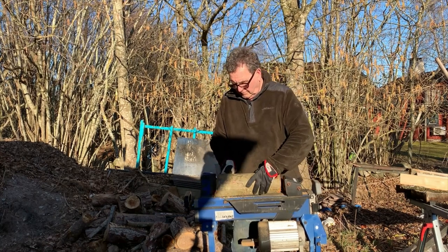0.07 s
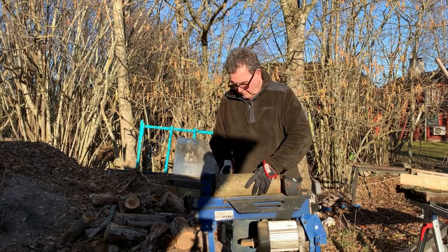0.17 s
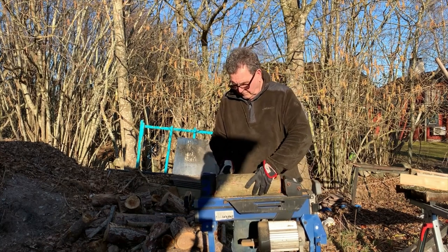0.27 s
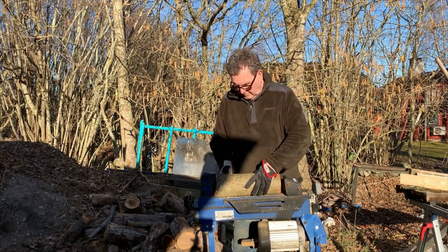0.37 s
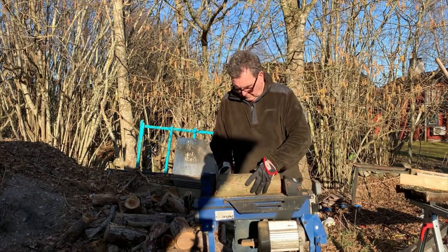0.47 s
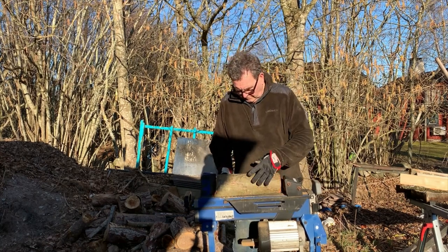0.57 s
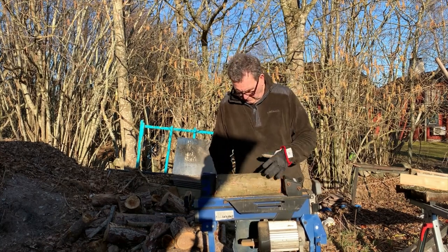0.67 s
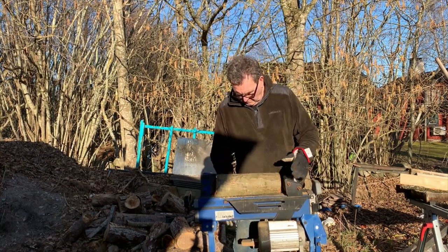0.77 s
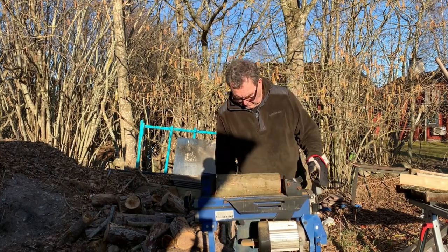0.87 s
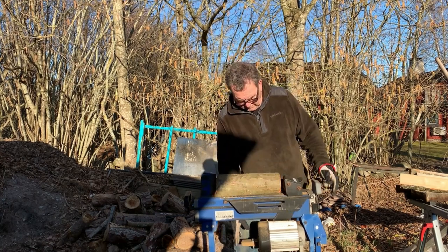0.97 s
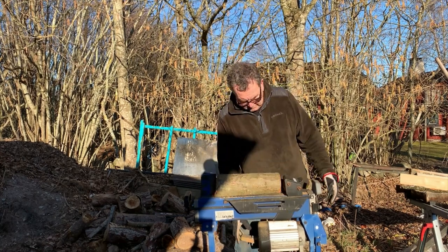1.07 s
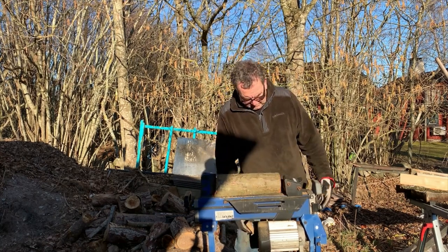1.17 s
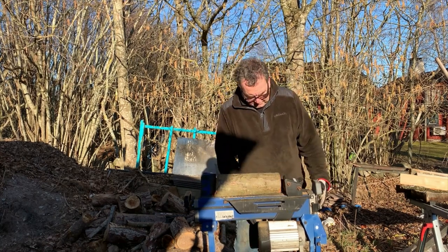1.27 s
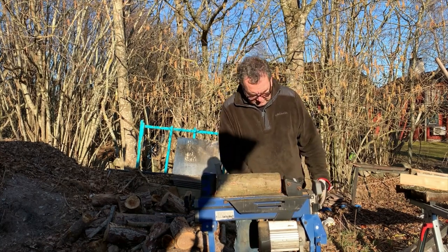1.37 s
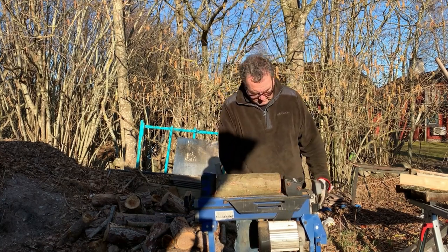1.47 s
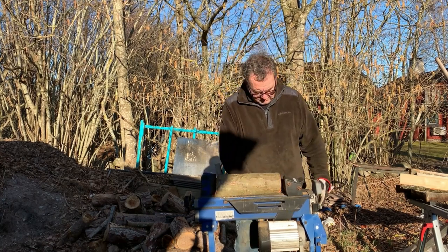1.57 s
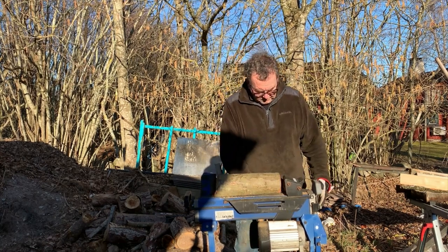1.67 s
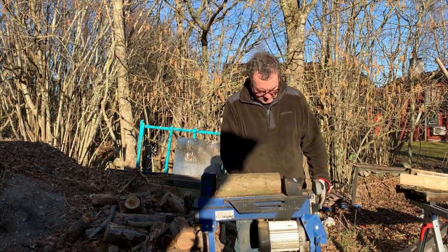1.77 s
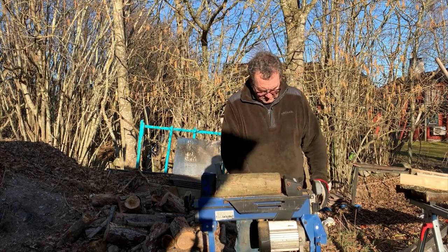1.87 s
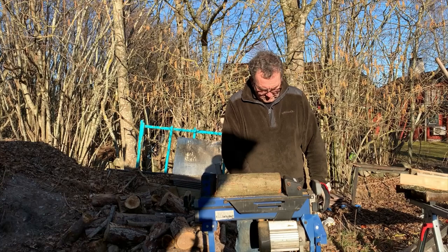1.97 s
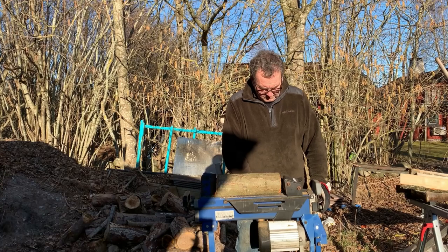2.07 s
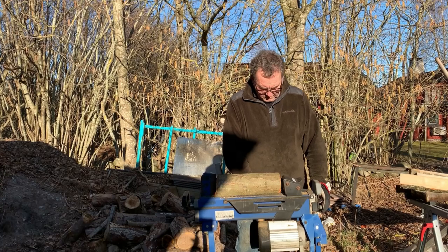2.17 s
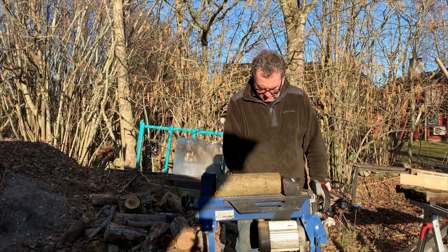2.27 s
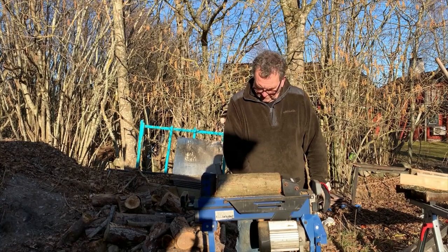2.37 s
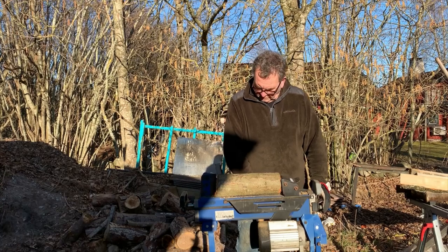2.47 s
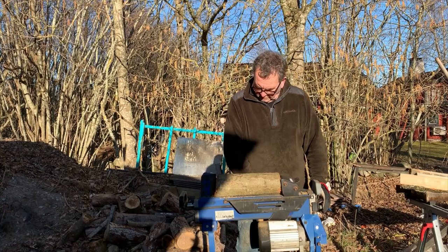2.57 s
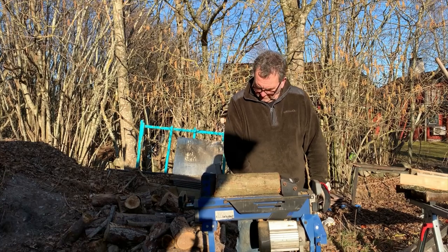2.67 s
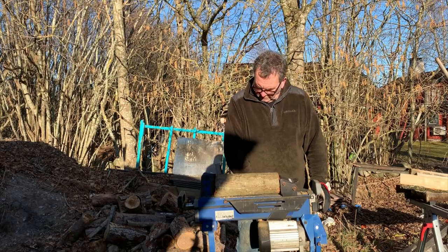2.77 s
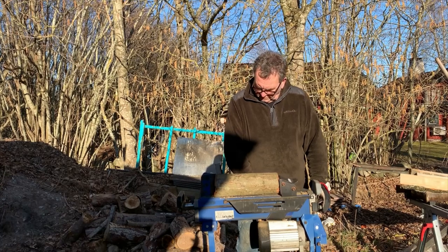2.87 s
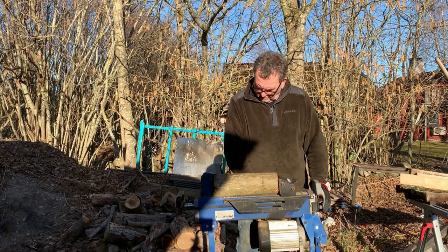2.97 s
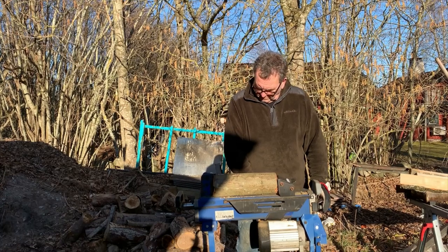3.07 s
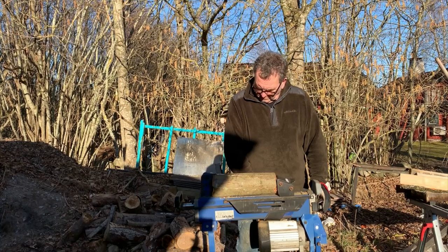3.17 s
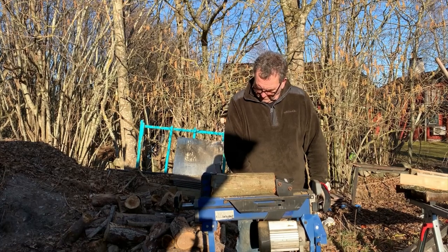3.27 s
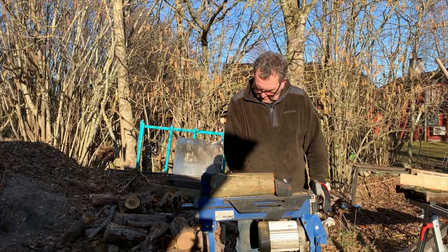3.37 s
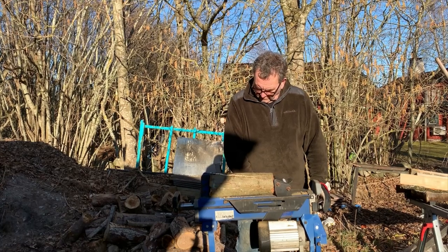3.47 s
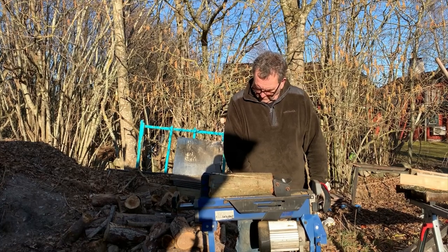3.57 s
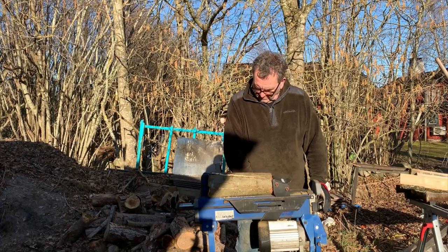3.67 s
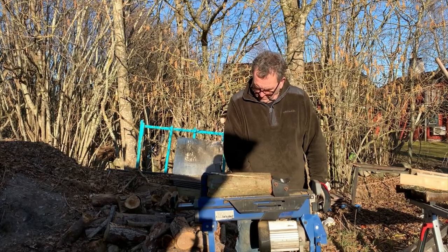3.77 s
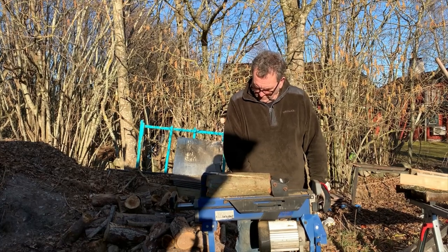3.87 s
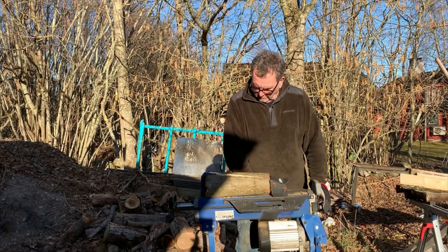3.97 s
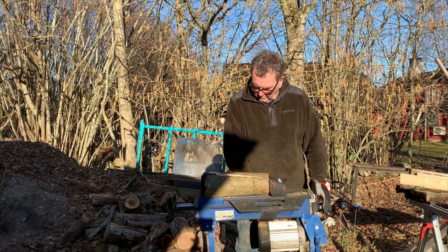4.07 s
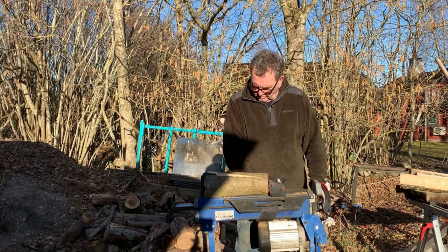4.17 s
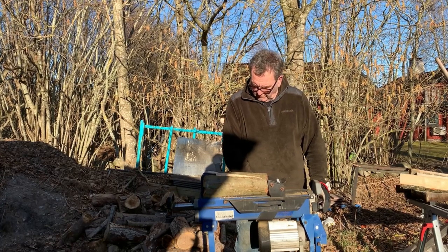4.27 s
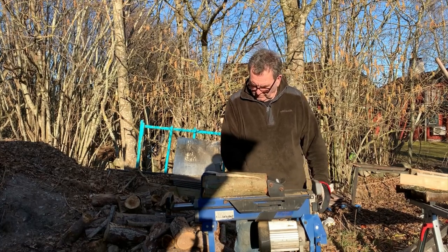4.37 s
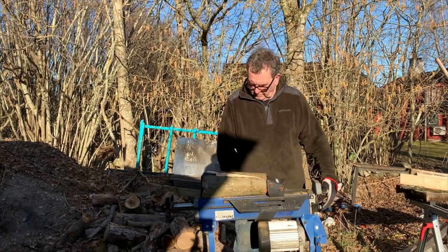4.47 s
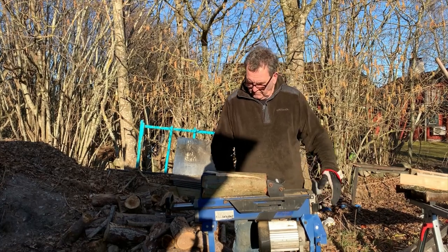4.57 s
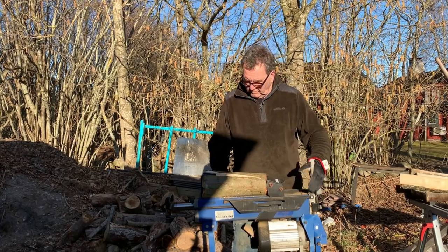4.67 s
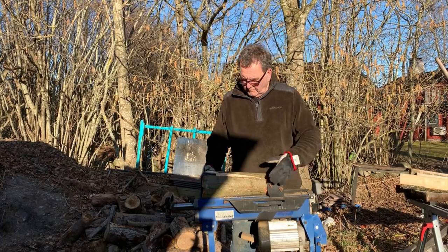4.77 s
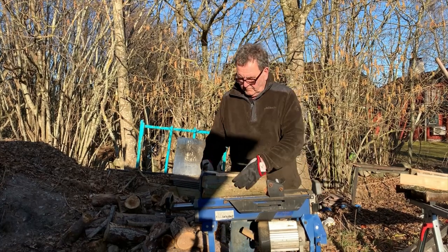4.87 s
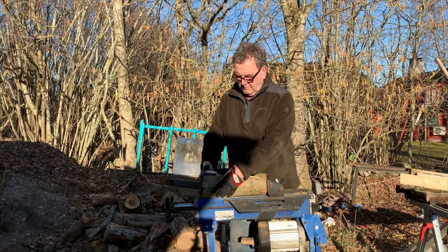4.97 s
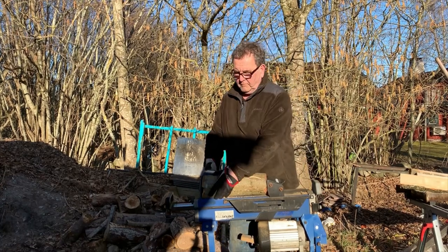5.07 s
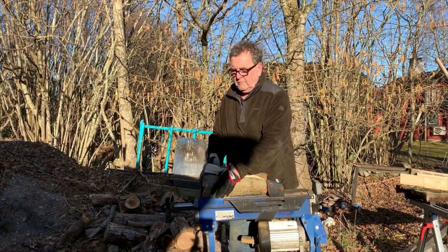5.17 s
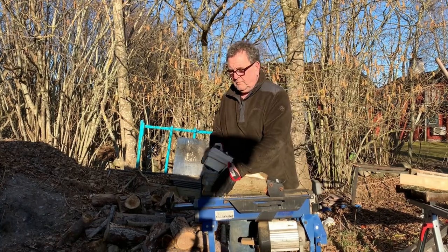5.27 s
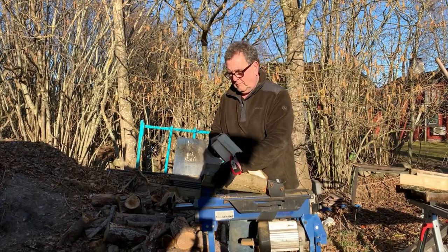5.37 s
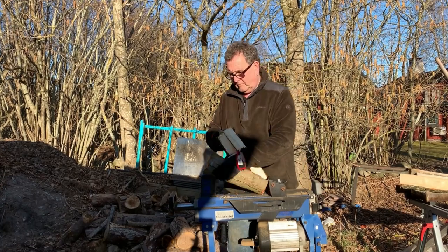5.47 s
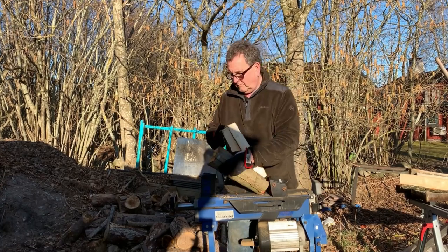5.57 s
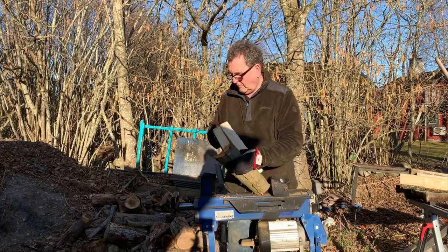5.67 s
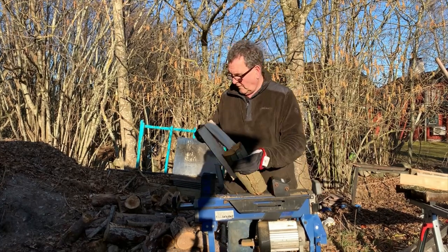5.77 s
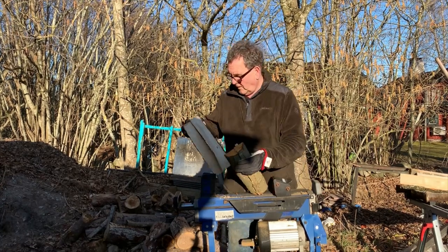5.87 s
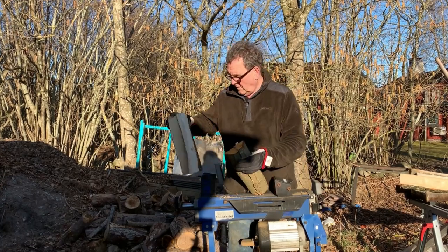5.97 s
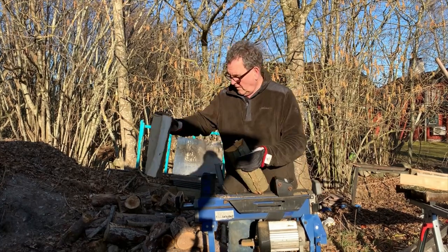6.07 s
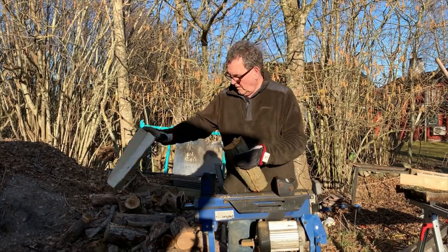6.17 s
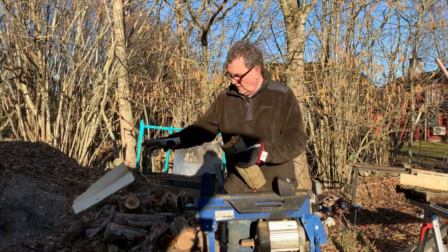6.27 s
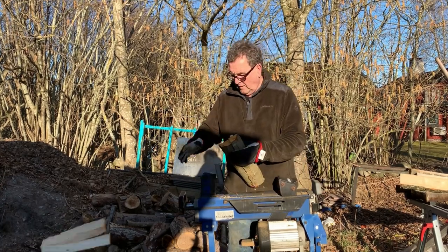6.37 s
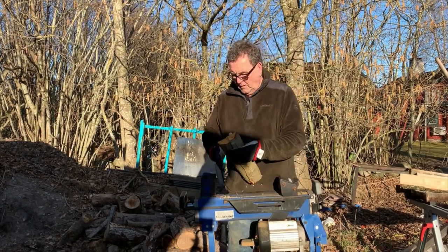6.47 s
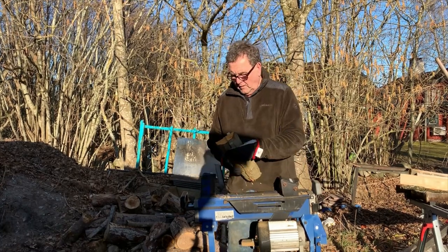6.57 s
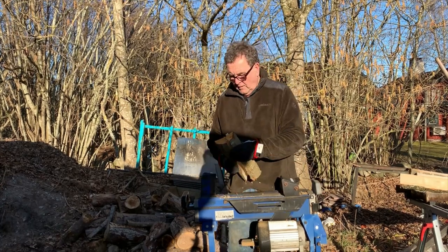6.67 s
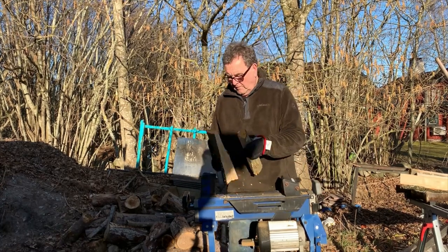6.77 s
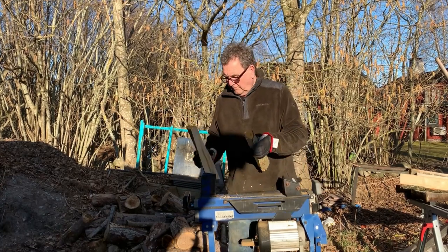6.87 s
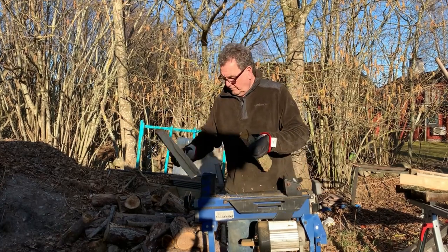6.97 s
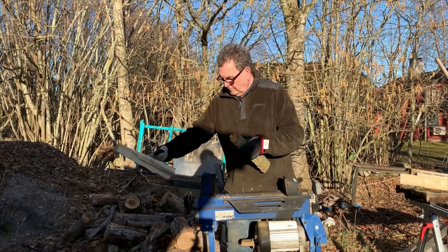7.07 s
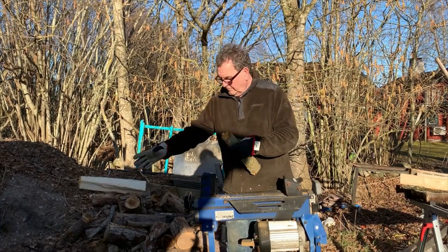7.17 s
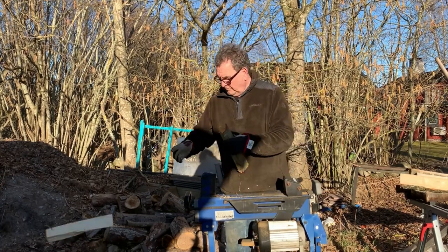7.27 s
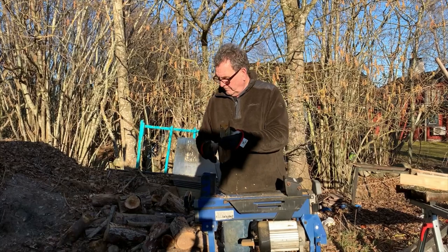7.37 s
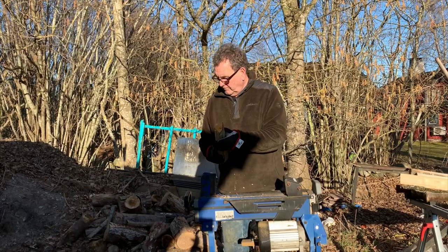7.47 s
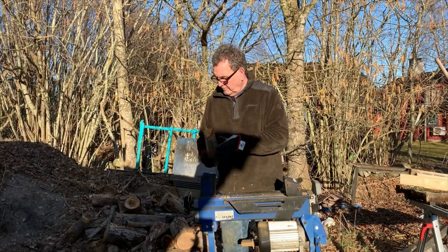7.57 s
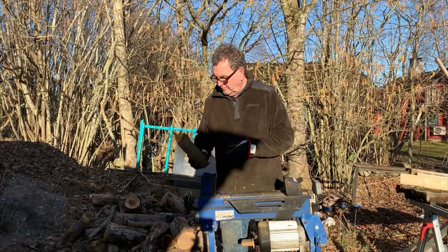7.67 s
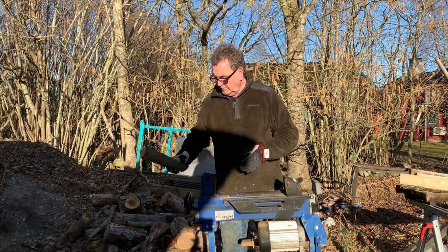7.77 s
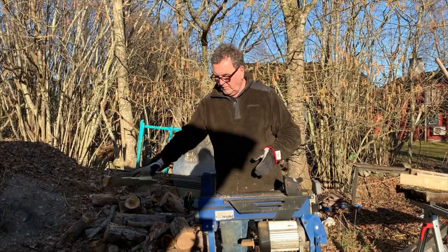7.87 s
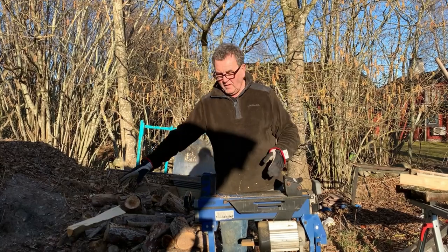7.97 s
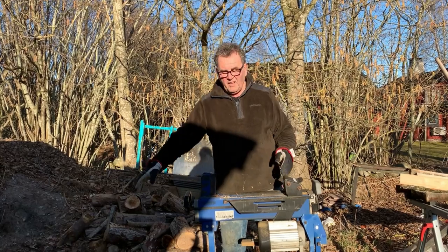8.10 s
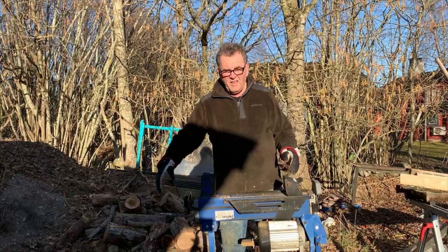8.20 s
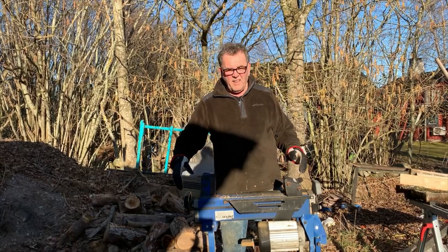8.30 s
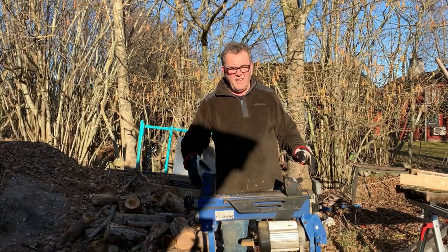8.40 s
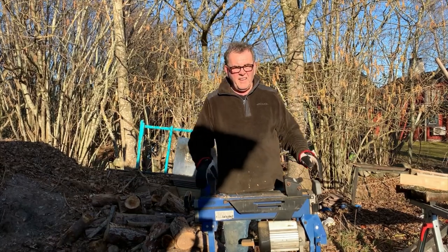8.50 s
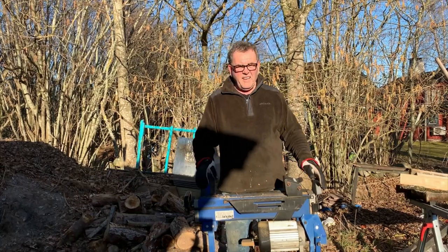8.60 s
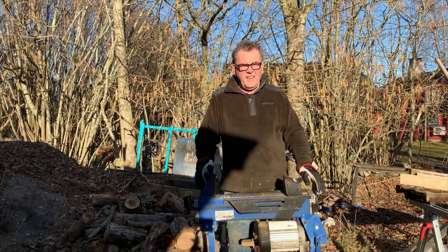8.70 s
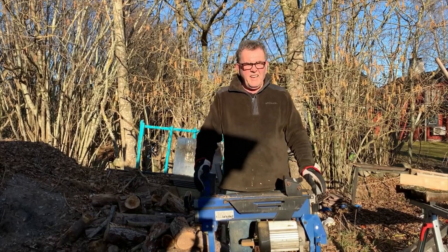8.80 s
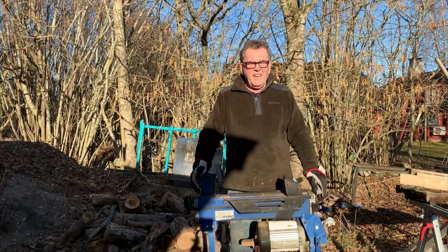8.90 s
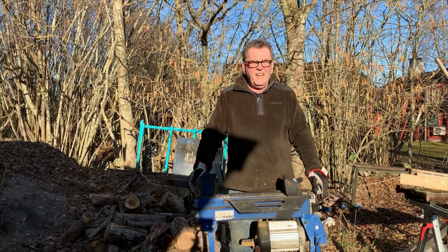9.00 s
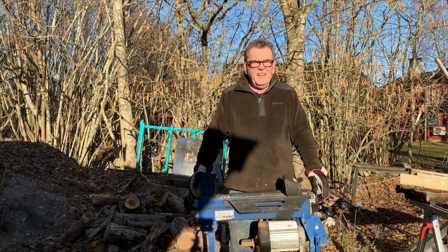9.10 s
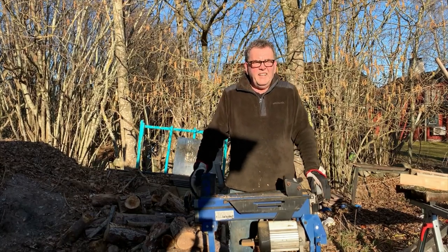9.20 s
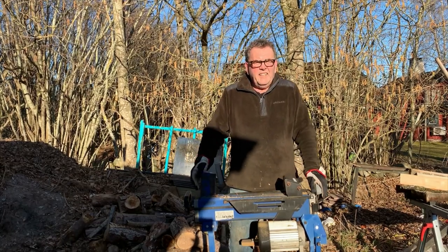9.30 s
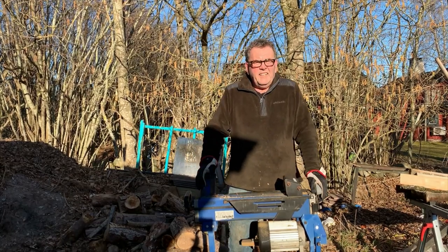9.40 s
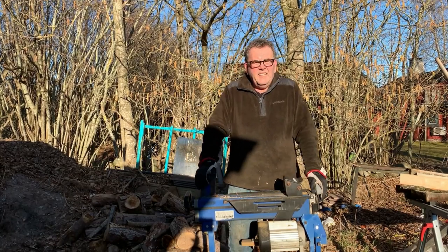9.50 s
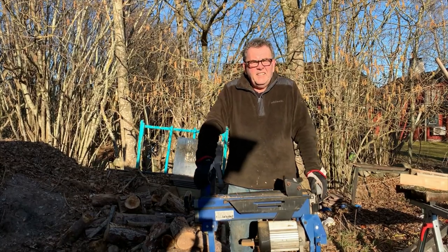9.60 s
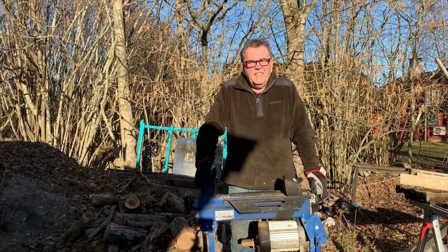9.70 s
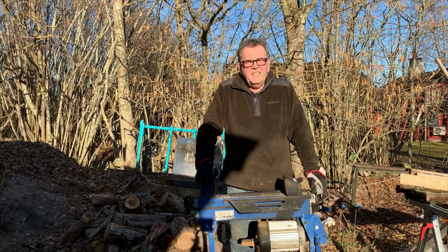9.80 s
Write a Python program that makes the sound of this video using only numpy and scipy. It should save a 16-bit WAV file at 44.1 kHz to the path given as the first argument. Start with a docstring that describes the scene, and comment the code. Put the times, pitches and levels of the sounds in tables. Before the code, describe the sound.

In a quiet garden with light wind and far traffic, a soft knock of wood comes first. At about 1.3 seconds a nearby electric log splitter starts, settling into a steady whine with a rattle, a low hum and an oily hiss. The whine swells under load, and from 2.8 to 3.4 seconds the log splinters in a cluster of loud, sharp cracks. The motor switches off around 4.5 seconds and coasts down. Until about 5.5 seconds the halves scrape, tick and knock, with one brief wooden groan. Thrown pieces land on a pile to the left at about 6.6, 7.5 and 8.2 seconds, each a loud, briefly ringing clack with a thud and a light rustle of dry leaves. A small bird's very faint falling whistles come between them and near the end, over a low rumble of wind.

```python
"""An electric log splitter in a garden, heard from a stereo microphone nearby. The motor spins up an
eleven-tooth gear pump that whines, rattles and sizzles with oil; the wedge loads a log until it cracks,
and the motor coasts down. The halves scrape apart and are thrown on a pile to the left, where they knock
and ring among dry leaves. Light wind, far traffic and a small bird's falling whistles fill the pauses."""
import sys
import numpy as np
from scipy import signal
from scipy.fft import rfft, irfft, next_fast_len
from scipy.io import wavfile
from scipy.ndimage import uniform_filter1d

SR = 44100
rng = np.random.default_rng(int(sys.argv[2]) if len(sys.argv) > 2 else 0)


def file_out(sig):
    """Save sig as 16-bit WAV at sys.argv[1]."""
    # one column per channel
    cols = np.atleast_2d(sig).T
    # limit, then scale
    lim = np.clip(cols, -1, 1)
    pcm = np.round(lim * 32767).astype(np.int16)
    wavfile.write(sys.argv[1], SR, pcm)


N = 433922
T = np.arange(N) / SR

SWITCH_ON_S, PUMPING_S, SWITCH_OFF_S, THROWING_S, AT_REST_S = 1.33, 1.52, 4.46, 5.9, 6.93
TEETH, START_HZ, RUN_HZ, SAG_HZ = 11, 200, 548.1, 2.7  # tooth rates; the sag is at full load
BUILD_S, COAST_S = .07, 1.1  # pressure build-up; time constant of the coast-down

# Oil pressure as the wedge bites: time_s, load_fraction
LOAD = [(2.1, 0), (2.55, 0.34), (2.655, 0.57), (2.69, 0.7), (2.79, 0.84), (2.86, 0.27), (2.93, 0.64),
        (3.0, 1), (3.29, 0.86), (3.33, 0.13)]
# Pump tones: multiple of the tooth rate
PUMP_ORDERS = (1, 2, 3, 5, 6, 8, 12 / 11, 7, 10)
# One row per pump tone: unloaded_db, full_load_rise_db
TOOTH_TONES = [(-62.5, 21), (-61.5, 33.5), (-55.5, 1), (-59, 5), (-64, 10.5), (-62.5, 3.5), (-54.5, -0.5),
               (-59.5, -1), (-65.5, 3)]
# Tones that swell as the ram travels: order, centre_s, half_length_s, rise_db
TONE_SWELLS = [(3, 1.814, 0.16, 11), (8, 2.25, 0.66, 13.5), (6, 4.0, 0.5, 14), (3, 4.44, .3, 6.5),
               (1, 3.8, 0.44, 10.5), (5, 2.2, 0.82, 6), (10, 1.9, .4, 9.5), (7, 4.25, 0.36, 1.5)]
# Running noise: idle_db, pumping_db, full_load_change_db, off_drop_db, drop_s, fade_db_per_s
HOUSING_LEVELS, OIL_LEVELS = (-53, -39, -0.3, 8.5, 0.22, 12.5), (-59, -37, -1.5, 9.5, 0.6, 25.5)
# Spectra of the housing rattle and the oil sizzle: frequency_hz, density_db
HOUSING_SPECTRUM = [(59, -43), (100, -10), (150, -19), (340, -3.5), (480, -6), (700, -9), (930, -5),
                    (1400, -5), (1850, -8), (2100, -6.5), (2450, -12), (3000, -9.5), (4700, -17.5),
                    (5500, -14.5), (6200, -26), (13200, -120)]
OIL_SPECTRUM = [(2600, -32), (4300, -11), (5500, -16), (7100, 0), (8600, -9.5), (11000, 1), (13400, -8.5),
                (15500, -14.5), (16000, -38)]
# Phase lead of the left microphone port for the splitter: frequency_hz, lead_rad
PORT_LEAD = [(0, 0), (3500, -.4), (4600, -1), (7000, -1.3), (8550, -3.14), (11600, -7.1), (13400, -9.42),
             (16500, -12.7)]

# Wood cracks, knocks and rubs: start_s, ring_peak_db, pitch_hz, snap_db, contact_s
KNOCKS = [(0.147, -36.5, 610, -55.5, 0.014), (1.256, -46, 650, -68, 0.035), (1.345, -38, 1480, -54, 0.0076),
          (1.382, -36, 740, -72, 0.003), (2.796, -9, 1358, -12.5, 0.0054), (2.816, -9.5, 687, -14.5, 0.007),
          (2.962, -37, 1090, -50, 0.012), (3, -26.5, 1110, -30, 0.026), (3.011, -20, 1400, -30.5, 0.006),
          (3.091, -21, 1080, -25, 0.0053), (3.128, -5.5, 1250, -16, 0.0033),
          (3.149, -17.5, 1060, -14, 0.0016), (3.194, -26, 1130, -22, 0.0035),
          (3.254, -24, 2100, -33, 0.004), (3.297, -4.5, 1364, -11.5, 0.0021),
          (3.313, -13, 1031, -30, 0.007), (3.356, -22.5, 775, -31.5, 0.019),
          (3.392, -13.5, 1240, -13, 0.0035), (3.409, -21, 1440, -33, 0.017),
          (3.793, -26, 1610, -26.5, 0.003), (4.18, -26, 4115, -36, 0.0079), (4.48, -24.5, 2713, -50, 0.019),
          (4.515, -28, 2400, -40, 0.017), (4.803, -26, 960, -61, 0.0012), (4.816, -30.5, 415, -60, 0.0013),
          (5.025, -32.5, 460, -47, 0.0041), (5.114, -28.5, 2530, -43, 0.0092),
          (5.185, -34.5, 1020, -50.5, 0.034), (5.283, -28, 2030, -40.5, 0.031),
          (5.394, -22.5, 1160, -38, 0.027), (5.474, -32, 1990, -46, 0.015), (5.739, -44, 693, -61, 0.0088),
          (6.56, -41.5, 1870, -55.5, 0.014), (6.585, -10, 950, -31.5, 0.0057),
          (6.594, -1, 842, -9.5, 0.0034), (6.608, -1, 1033, -28, 0.0032), (6.679, -29, 1030, -47, 0.055),
          (6.728, -35, 1030, -47, 0.014), (6.856, -40, 970, -53, 0.052), (7.069, -37, 1210, -60, 0.023),
          (7.461, -33.5, 2330, -66, 0.018), (7.509, -10, 1140, -29.5, 0.0096),
          (7.546, -28, 890, -36, 0.019), (8.188, -37.5, 2340, -61, 0.0077),
          (8.211, -20, 1020, -34.5, 0.0065), (8.216, -9, 940, -28.5, 0.0029),
          (8.2406, -18, 1990, -11.5, 0.0025), (8.259, -0.5, 906, -38, 0.0023),
          (8.245, -12.5, 2030, -46, 0.018), (8.447, -32, 1030, -50.5, 0.013),
          (8.493, -36, 1590, -55, 0.016), (8.547, -43, 1253, -53, 0.0081),
          (8.828, -45.5, 2700, -67, 0.0039), (9.691, -47.5, 1310, -56.5, 0.0041)]
# Modes of a billet: pitch_ratio, level_db
WOOD_MODES = [(0.379, -17.5), (0.559, -9.5), (.84, -7.5), (1., 5.5), (1.35, -6.5), (1.701, -8.5), (2.2, -9),
              (3.101, -9), (4.301, -19)]
CRACK_T60, RING_ON_DB = .022, -30  # ring time on the frame in seconds; lasting ring on the pile
# Wood on the frame and on the pile, a row for a blow and a row for a rub:
# rise_s, t60_at_1khz_s, crumble_db, lasting_ring_db, snap_sharpness, low_modes_db, high_modes_db
ON_FRAME = [(.0008, CRACK_T60, -16, -33.5, 1.6, -5, -1), (.0015, 0.011, -29, -53.5, 1.4, 6, 1.5)]
ON_PILE = [(0.00081, 0.022, -24.5, RING_ON_DB, 2.2, -6, -12.5), (0.00074, 0.013, -20.5, -45.5, 1.1, 5, -6)]
# Lasting modes of a loose billet: from_s, low_hz, middle_hz, high_hz
LOOSE_BILLETS = [(0, 1030, 1448, 2388), (8, 962, 1307, 2032)]
# Tearing fibres, a list per stretch: time_s, level_db
FIBRES = [
    [(2.6, -46.5), (2.77, -33.5), (2.9, -41), (3.328, -42.5), (3.5, -38)],
]
# Low thuds of the log cracking and of wood bumping or landing: start_s, level_db, pitch_hz
THUDS = [(0.144, -37, 257), (1.345, -39.5, 340), (2.798, -14, 620), (3.299, -15, 276), (6.066, -36, 52.5),
         (6.552, -30, 78.2), (6.61, -8, 380), (6.616, -15.5, 143), (7.162, -31.5, 127), (7.513, -16, 344),
         (7.52, -20, 194), (7.55, -28, 71.5), (8.245, -28, 300), (8.553, -43, 144.5)]
# Bark and twigs ticking: start_s, level_db, decay_s
TICKS = [(.202, -50, .001), (.373, -51, 0.00085), (.461, -58, .001), (5.119, -28.5, .0015),
         (4.976, -25.5, 0.003), (5.26, -27, 0.0012), (6.793, -31.5, 0.00054), (6.994, -47, 0.0022),
         (7.129, -44, 0.0024)]
# The motor's start-up whirr and a later groan, a list per glide: time_s, pitch_hz, level_db
GLIDES = [
    [(1.38, 700, -54), (1.6, 714, -64)],
    [(1.505, 1420, -56), (1.57, 1550, -45.5), (1.66, 1405, -58)],
    [(5.28, 330, -49), (5.33, 356, -54), (5.38, 370, -39.5), (5.415, 381, -31), (5.45, 386, -64)],
]
# Split halves dragged apart, a list per drag: time_s, level_db
SCRAPES = [
    [(4.95, -48), (5.2, -51.5), (5.312, -51.5), (5.55, -50.5)],
]
# Leaves stirred by handling and landing wood: start_s, level_db, hold_s
RUSTLES = [(0.105, -59.5, 0.021), (0.37, -90, 0.067), (1.053, -82, 0.035), (5.45, -74, 0.75),
           (6.59, -56.5, 0.18), (6.866, -61, 0.12), (7.052, -60, 0.11), (7.263, -70, 0.082),
           (7.378, -67, 0.085), (7.516, -49, 0.096), (7.657, -61, 0.19), (8.24, -58, 0.25),
           (8.449, -66, 0.2), (8.787, -72.5, 0.17)]
# Spectra of the wood and leaf noises: frequency_hz, density_db
SNAP_SPECTRUM = [(700, -16.5), (1500, 0), (2500, -5), (4300, -7), (7000, -10), (10400, -11), (15500, -16.5),
                 (16500, -33)]
PILE_SPECTRUM = [(700, -22.5), (1500, -8), (2900, -4.5), (4300, -2.5), (5600, -14.5), (7000, -4),
                 (10400, -7), (15500, -15), (16500, -29.5)]
TICK_SPECTRUM = [(2000, -27), (5000, -7), (11000, 0), (16500, -9)]
GRIT_SPECTRUM = [(300, -18), (2200, -1.5), (4500, -10.5), (16000, -16.5)]
LEAF_SPECTRUM = [(200, -26), (500, -12.5), (1050, -11.5), (2500, -15.5), (4500, -16.5), (8000, -20.5),
                 (15500, -18), (16000, -49)]

# Falling whistles of the bird: start_s, start_hz, level_db, length_s
BIRD_CALLS = [(1.28, 3500, -72, .13), (5.72, 4200, -73, .12), (6.085, 4800, -69, .16), (6.5, 3600, -69, .1),
              (8.93, 3400, -76, .22), (9.245, 5600, -69, .21), (9.595, 5700, -65, .24)]
# Strength of the wind: time_s, level_db
WIND_LEVELS = [(0, -66.5), (4.5, -61.5), (5.7, -70), (6.1, -56), (6.9, -54), (7.6, -52), (8.6, -60.5),
               (9.0, -53), (9.4, -61.5), (9.8, -48.5)]
# Spectra of the wind and the far traffic: frequency_hz, density_db
WIND_SPECTRUM = [(15, -32.5), (30, -10.5), (60, 1), (110, -13.5), (250, -34), (400, -71)]
TRAFFIC_SPECTRUM = [(59, -40.5), (100, -7.5), (150, -14), (267, -14), (486, -20.5), (577, -23),
                    (1300, -28.5), (1800, -39.5), (16500, -60)]
# Likeness of the traffic in left and right: frequency_hz, correlation
TRAFFIC_LIKENESS = [(60, 0.037), (240, 1), (950, 0.067), (15000, 0.29)]


def splitter():
    """The running machine: housing rattle, oil sizzle, pump whine and 100 Hz mains hum."""
    turns = np.cumsum(tooth_hz()) / TEETH / SR
    housing = gain_of(running_db(*HOUSING_LEVELS) + 1.2 * drift(22))
    housing *= coloured(shaft_rattle(turns, turns_kept=9, repeat=0.29, uneven_db=2), HOUSING_SPECTRUM)
    dull = signal.sosfilt(signal.butter(2, 1710, fs=SR, output="sos"), housing)
    housing = dull + pumping() * (housing - dull)  # dull until the oil is under pressure
    oil = pumping() * gain_of(running_db(*OIL_LEVELS) + 1.1 * drift(40))
    oil *= coloured(shaft_rattle(turns, turns_kept=14, repeat=0.56, uneven_db=-1), OIL_SPECTRUM)
    powered = pumping() * np.interp(T, [SWITCH_OFF_S, SWITCH_OFF_S + BUILD_S], [1, 0])
    whine = pump_whine(turns) * powered ** 4
    hum = np.sqrt(2) * gain_of(-54.5 + 2.5 * drift(12)) * np.sin(2 * np.pi * 100 * T) * powered
    turning = np.interp(T, [SWITCH_ON_S, SWITCH_ON_S + 0.013, AT_REST_S - .9, AT_REST_S], [0, 1, 1, 0])
    noise = turning * from_splitter(housing + oil, scatter=0.56)
    return noise + from_splitter(whine, scatter=0.078) + np.outer([1, -.6], hum)


def pump_whine(turns):
    """Meshing teeth give tones that throb once a turn; higher orders are grainier and throb more."""
    out = np.zeros(N)
    for order, (unloaded_db, rise_db) in zip(PUMP_ORDERS, TOOTH_TONES):
        swell_db = sum(db * np.exp(-((T - centre_s) / half_s) ** 8)
                       for swelling, centre_s, half_s, db in TONE_SWELLS if swelling == order)
        flicker_db = 2.7 * drift(30) + .25 * order * drift(250)
        level = gain_of(unloaded_db + rise_db * curve(LOAD) + swell_db + flicker_db)
        throb = 1 + .04 * order * np.cos(2 * np.pi * turns)
        out += level * throb * np.sin(2 * np.pi * order * TEETH * turns + .5 * drift(60))
    return np.sqrt(2) * out


def shaft_rattle(turns, turns_kept, repeat, uneven_db):
    """Noise that repeats with each turn of the shaft and slowly renews itself, plus fresh noise."""
    orders = gain_of(uneven_db * rng.standard_normal(401))  # some shaft orders stand out
    patterns = unit_rms(irfft(orders * rfft(rng.standard_normal((40, 800))), 8000))
    place = (turns % 1 * patterns.shape[1]).astype(int)
    age = np.minimum(turns / turns_kept, len(patterns) - 2)
    fade, row = np.pi / 2 * (age % 1), age.astype(int)
    repeating = np.cos(fade) * patterns[row, place] + np.sin(fade) * patterns[row + 1, place]
    share = repeat * (tooth_hz() / RUN_HZ) ** 10  # loose parts lose step off speed
    return np.sqrt(share) * repeating + np.sqrt(1 - share) * rng.standard_normal(N)


def tooth_hz():
    """The pump's tooth rate runs up, sags under load and coasts down."""
    run_up = np.interp(T, [SWITCH_ON_S, PUMPING_S + BUILD_S], [START_HZ, RUN_HZ])
    return (run_up - SAG_HZ * curve(LOAD)) * np.exp(-np.maximum(T - SWITCH_OFF_S, 0) / COAST_S)


def pumping():
    """Rises from 0 to 1 as the oil comes under pressure."""
    return np.interp(T, [PUMPING_S, PUMPING_S + BUILD_S], [0, 1])


def running_db(idle_db, pumping_db, load_db, drop_db, drop_s, fade_db_per_s):
    """Running noise rises as the oil flows, then drops and fades after switch-off."""
    off_s = np.maximum(T - SWITCH_OFF_S, 0)
    driven_db = idle_db + (pumping_db - idle_db) * pumping() + load_db * curve(LOAD)
    return driven_db - drop_db * (1 - np.exp(-off_s / drop_s)) - fade_db_per_s * off_s


def wood_knocks(rows, surface, spectrum, rub_s=.0075):
    """Each contact snaps fibres and drives the billet's modes; a long one is a rub and damps the ring."""
    size = 10000
    out, t = np.zeros(N + size), np.arange(size) / SR
    taper = np.cos(np.pi / 2 * np.arange(size) / size)
    billets = [(from_s, loose_billet(t, modes_hz)) for from_s, *modes_hz in LOOSE_BILLETS]
    for start_s, peak_db, pitch_hz, snap_db, contact_s in rows:
        rise_s, t60_s, crumble_db, lasting_db, sharpness, low_db, high_db = surface[contact_s > rub_s]
        lasting = [billet for from_s, billet in billets if start_s >= from_s][-1]
        modes = billet_modes(t, pitch_hz, t60_s, low_db, high_db) + gain_of(lasting_db) * lasting
        contact = t / (t + rise_s) * np.exp(-t / contact_s)
        ring = signal.fftconvolve(modes, rng.standard_normal(size) ** 3 * contact)[:size] * taper
        crumbs = 1 + 0.48 * abs(rng.standard_normal(size // 100)).repeat(100)
        tail = gain_of(crumble_db - 60 * t / 0.22) * crumbs * np.minimum(t / 0.003, 1)
        envelope = (contact / contact.max()) ** sharpness + tail
        snap = gain_of(snap_db) * envelope * coloured(rng.standard_normal(size), spectrum)
        out[round(start_s * SR):][:size] += gain_of(peak_db) * ring / abs(ring).max() + snap
    return signal.sosfilt(signal.butter(2, 180, "high", fs=SR, output="sos"), out[:N])


def billet_modes(t, pitch_hz, t60_s, low_db, high_db):
    """Struck wood rings; high modes die first, and all but the main one shift from blow to blow."""
    ratios, levels_db = np.transpose(WOOD_MODES)
    modes_hz = pitch_hz * ratios * np.where(ratios == 1, 1, rng.uniform(0.94, 1.05, len(ratios)))
    levels_db = levels_db + low_db * (ratios < .7) + high_db * (ratios > 2.6)
    return sum(gain_of(db - 60 * t / t60_s * (hz / 1000) ** 0.46) * np.sin(2 * np.pi * hz * t)
               for hz, db in zip(modes_hz, levels_db) if hz > 200)


def loose_billet(t, modes_hz, levels_db=(-7, -14, -12), t60_s=.7):
    """A loose billet rings on after a blow, its modes broken up by its rattling."""
    a, b = unit_rms(uniform_filter1d(rng.standard_normal((2, len(modes_hz), len(t))), 350))
    phase = 2 * np.pi * np.outer(modes_hz, t)
    return gain_of(levels_db) @ (a * np.cos(phase) + b * np.sin(phase)) * gain_of(-60 * t / t60_s)


def tearing_fibres():
    """The log splinters around the big cracks."""
    level = during(FIBRES) * gain_of(curve(FIBRES) + 4 * drift(60))
    return level * coloured(crackle(per_s=2500, spread_db=6.5, hiss=0.22), SNAP_SPECTRUM)


def thuds():
    """The log cracks, or wood bumps or lands: a low tone that falls 60 dB in 14 cycles."""
    out, t = np.zeros(N + 9000), np.arange(9000) / SR
    for start_s, db, hz in THUDS:
        envelope = gain_of(db - 60 * t * hz / 14) * np.minimum(t * hz / 0.31, 1)
        out[round(start_s * SR):][:len(t)] += envelope * np.sin(2 * np.pi * hz * t)
    return out[:N]


def bark_ticks():
    """Bark and twigs give very short, bright bursts."""
    out, t = np.zeros(N), np.arange(1024) / SR
    for start_s, db, decay_s in TICKS:
        burst = coloured(rng.standard_normal(len(t)), TICK_SPECTRUM)
        out[round(start_s * SR):][:len(t)] += gain_of(db) * np.exp(-t / decay_s) * burst
    return out


def whirr_and_groan():
    """Short wavering glides: the motor's start-up whirr and a later groan."""
    out = np.zeros(N)
    for rows in GLIDES:
        hz = curve(rows) * (1 + 0.062 * drift(150))
        level = during([rows], fade_s=0.0086) * gain_of(curve(rows, column=2))
        out += level * np.sqrt(2) * np.sin(2 * np.pi * np.cumsum(hz) / SR)
    return out


def scrape():
    """Fine grit of wood sliding on wood."""
    level = during(SCRAPES) * gain_of(curve(SCRAPES) + 4.5 * drift(30))
    return level * coloured(crackle(per_s=12000, spread_db=5.5, hiss=0.74), GRIT_SPECTRUM)


def leaves(rise_s=0.024, fade_db_per_s=170, still_db=-82.5):
    """Dry leaves rustle in short bursts over a faint, constant crackle."""
    level = gain_of(still_db)
    for start_s, db, hold_s in RUSTLES:
        fade_db = fade_db_per_s * np.maximum(T - start_s - hold_s, 0)
        level = level + np.clip((T - start_s) / rise_s, 0, 1) * gain_of(db - fade_db)
    flicker = gain_of(3.8 * drift(35))
    return level * flicker * coloured(crackle(per_s=2200, spread_db=4.2, hiss=0.8), LEAF_SPECTRUM)


def bird(rest_hz=3000, glide_s=.036):
    """A faint bird, centred: each whistle slides down and settles on one note, fading."""
    out = np.zeros(N)
    for start_s, start_hz, db, length_s in BIRD_CALLS:
        start, t = round(start_s * SR), np.arange(int(length_s * SR)) / SR
        waver_hz = 400 * uniform_filter1d(rng.standard_normal(len(t)), 60)
        hz = rest_hz + (start_hz - rest_hz) / (1 + (t / glide_s) ** 3.4) + waver_hz
        swell = np.minimum(t / .07, 1) * signal.windows.tukey(len(t), .5)
        call = swell * gain_of(db - 12 * t / length_s) * np.sin(2 * np.pi * np.cumsum(hz) / SR)
        out[start:][:len(t)] += call[:N - start]
    return np.array([out, out])


def wind():
    """Light wind: a lumpy rumble, partly alike in left and right."""
    mid, side = rng.standard_normal((2, N))
    rumble = coloured(np.array([mid + .6 * side, mid - .6 * side]), WIND_SPECTRUM)
    return gain_of(curve(WIND_LEVELS) + 4 * drift(7)) * rumble


def far_traffic(level_db=-61.5):
    """Traffic far beyond the garden: a low wash whose level wanders."""
    size = next_fast_len(N)
    noise = rfft(rng.standard_normal((2, size)))
    likeness = at_frequencies(TRAFFIC_LIKENESS, size)
    noise[1] = likeness * noise[0] + np.sqrt(1 - likeness ** 2) * noise[1]
    return gain_of(level_db + 2.9 * drift(3.1)) * coloured(irfft(noise, size)[:, :N], TRAFFIC_SPECTRUM)


def garden_echoes(x, t60_s=0.11):
    """Scattered echoes off trunks, fence and pile."""
    t = np.arange(14000) / SR
    taps = rng.standard_normal((2, len(t))) * (rng.random((2, len(t))) < .06)
    taps *= gain_of(-60 * t / t60_s) * (t > .006)
    return signal.fftconvolve(x, taps / np.linalg.norm(taps[0]), axes=1)[:, :N]


def from_splitter(x, scatter):
    """The microphone's two ports hear the splitter out of phase; scattered paths make them differ."""
    size = next_fast_len(N)
    lead_rad = np.interp(np.fft.rfftfreq(size, 1 / SR), *np.transpose(PORT_LEAD))
    direct = np.exp(.5j * np.outer([1, -1], lead_rad))
    paths = rng.standard_normal((2, 900)) * np.exp(-np.arange(900) / 330)
    scattered = scatter * rfft(paths / np.linalg.norm(paths[0]), size)
    return irfft(rfft(x, size) * (direct + scattered), size)[:, :N] / np.sqrt(1 + scatter ** 2)


def from_pile(x):
    """The pile lies to the left: the right port hears it later and, near 700 Hz, shaded."""
    late = np.roll(x, 8)
    shade = signal.lfilter(*signal.iirpeak(700, 1.2, SR), late)
    return np.array([x, late - 0.74 * shade])


def crackle(per_s, spread_db, hiss):
    """Dense tiny snaps, a few large, over hiss; louder on the left."""
    sizes = gain_of(spread_db * np.minimum(rng.exponential(1, (2, N)), 5))
    snaps = sizes * (rng.random((2, N)) < per_s / SR) * rng.choice([-1., 1.], (2, N))
    left, right = snaps + hiss * rng.standard_normal((2, N))
    return np.array([left, 0.048 * np.roll(left, 8) + .5 * right])


def gain_of(db):
    """dB to gain."""
    return np.exp(np.asarray(db) * (np.log(10) / 20))


def unit_rms(x):
    """Scales to rms 1."""
    return x / np.sqrt(np.mean(x ** 2) + 1e-20)


def at_frequencies(points, size):
    """A table's value at each FFT bin, read on a log frequency axis."""
    hz, value = np.transpose(points)
    return np.interp(np.log(np.fft.rfftfreq(size, 1 / SR) + 1), np.log(hz + 1), value)


def coloured(x, spectrum):
    """Gives x a spectrum, rms 1."""
    size = next_fast_len(x.shape[-1])
    shaped = irfft(rfft(x, size) * gain_of(at_frequencies(spectrum, size)), size)
    return unit_rms(shaped[..., :x.shape[-1]])


def curve(rows, column=1):
    """One column of a table at every sample."""
    rows = np.vstack(rows)
    return np.interp(T, rows[:, 0], rows[:, column])


def during(spans, fade_s=0.11):
    """Fades up to 1 inside each span, 0 outside."""
    return sum(np.clip(np.minimum(T - rows[0][0], rows[-1][0] - T) / fade_s, 0, 1) for rows in spans)


def drift(per_s):
    """Glides between per_s random values a second."""
    count = int(N / SR * per_s) + 3
    return np.interp(T * per_s, np.arange(count), rng.standard_normal(count))


def scene():
    """The garden at the microphone, with echoes on the knocks, the ticks and the bird."""
    frame = wood_knocks([row for row in KNOCKS if row[0] < THROWING_S], ON_FRAME, SNAP_SPECTRUM)
    pile = wood_knocks([row for row in KNOCKS if row[0] >= THROWING_S], ON_PILE, PILE_SPECTRUM)
    wood = from_splitter(frame + bark_ticks(), scatter=0.66) + from_pile(pile)
    calls = bird()
    echoes = garden_echoes(gain_of(-10) * wood + calls)
    work = wood + thuds() + whirr_and_groan() + splitter() + tearing_fibres() + scrape() + leaves()
    return work + calls + echoes + wind() + far_traffic()


def record(dry, ceiling=.9, edge_hz=16700):
    """The microphone input rounds off the loudest peaks and cuts the highest treble."""
    rounded = ceiling * np.tanh(dry / ceiling)
    low_pass = signal.firwin(511, edge_hz, window=("kaiser", 9), fs=SR)
    return signal.oaconvolve(rounded, low_pass[None], "same")


dry = scene()
out = record(dry)
file_out(out)
```